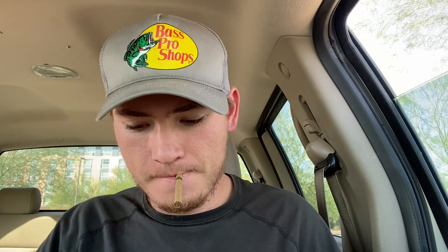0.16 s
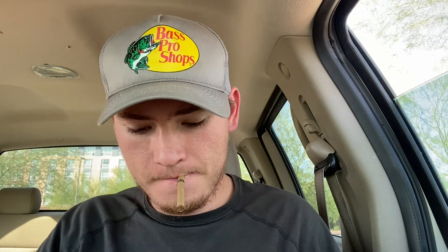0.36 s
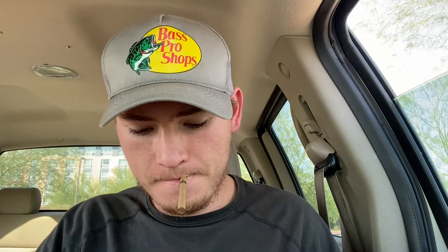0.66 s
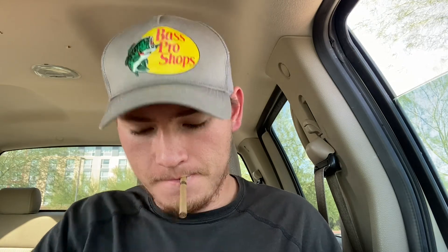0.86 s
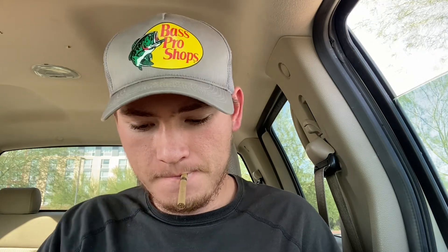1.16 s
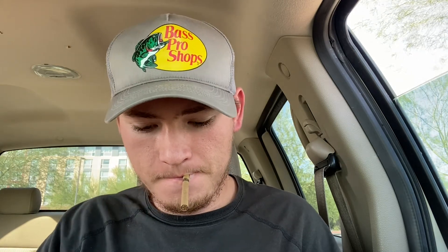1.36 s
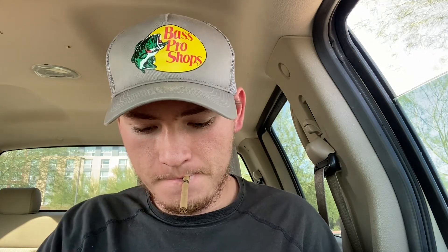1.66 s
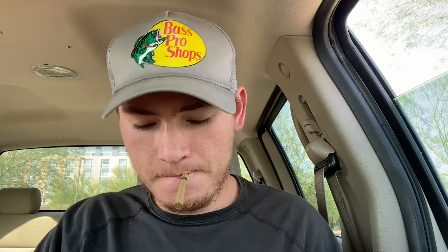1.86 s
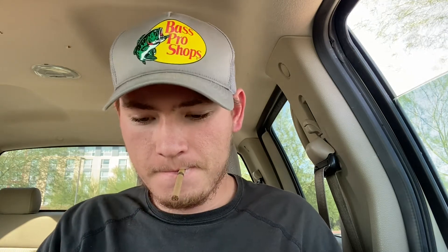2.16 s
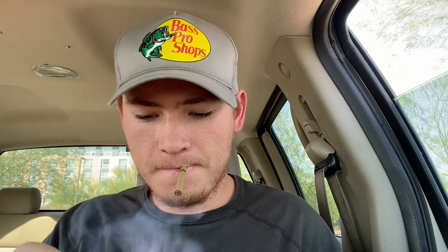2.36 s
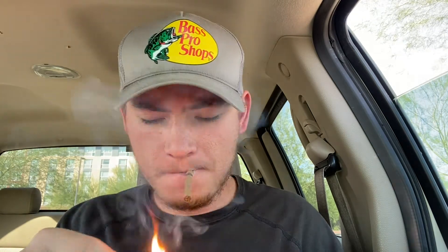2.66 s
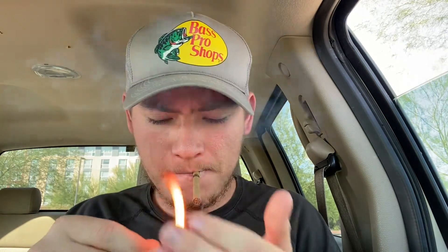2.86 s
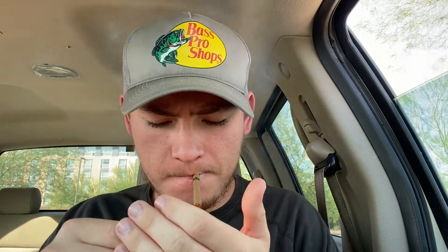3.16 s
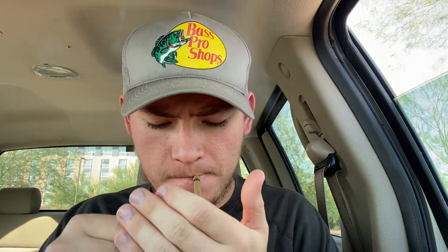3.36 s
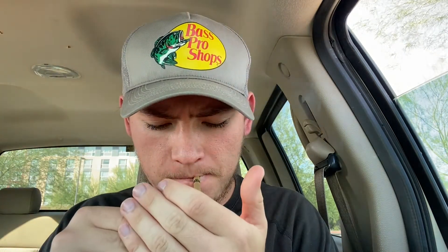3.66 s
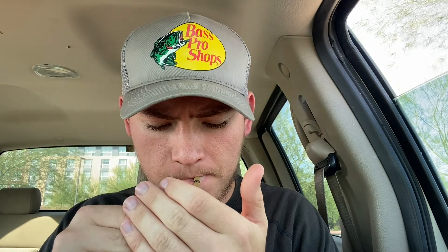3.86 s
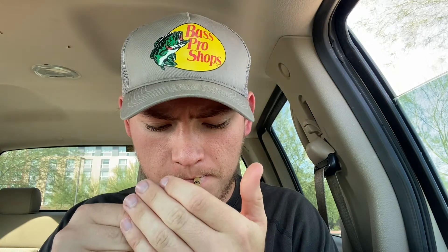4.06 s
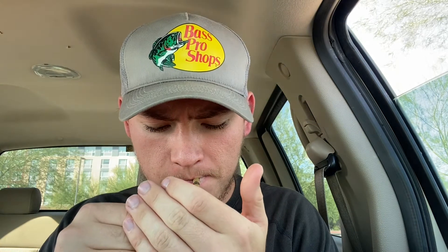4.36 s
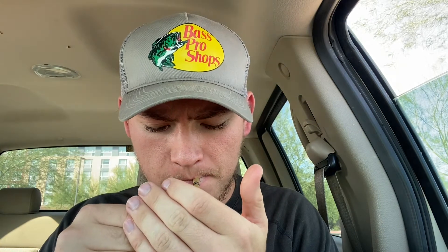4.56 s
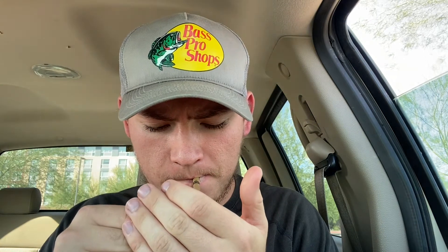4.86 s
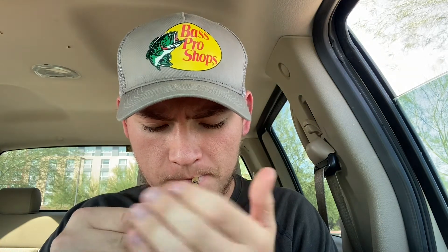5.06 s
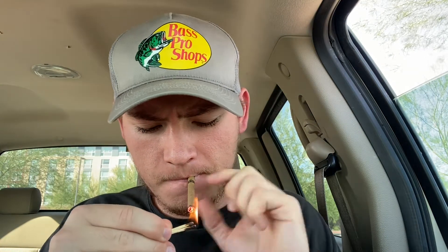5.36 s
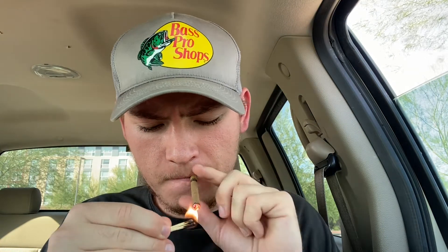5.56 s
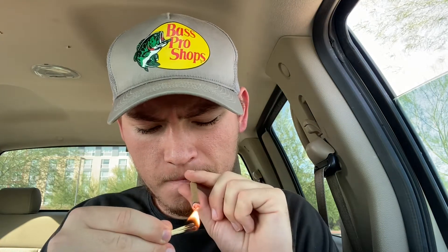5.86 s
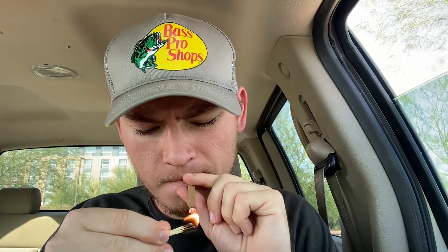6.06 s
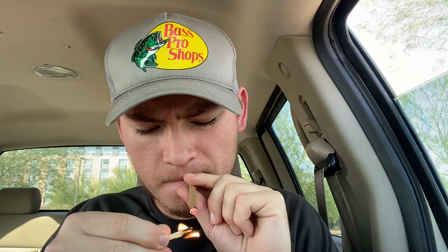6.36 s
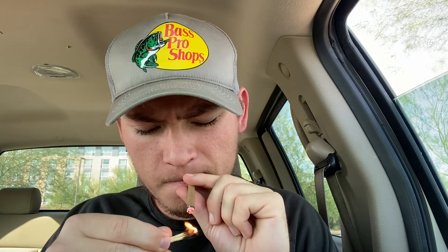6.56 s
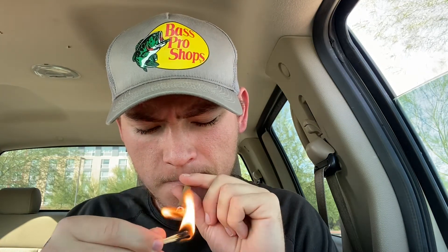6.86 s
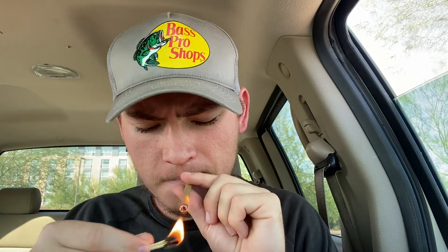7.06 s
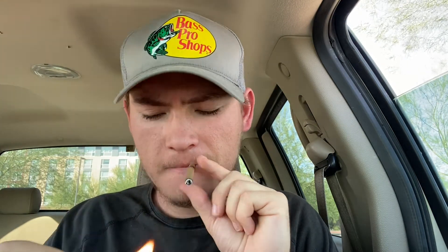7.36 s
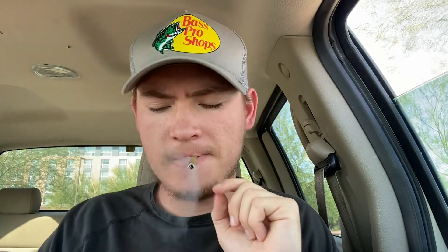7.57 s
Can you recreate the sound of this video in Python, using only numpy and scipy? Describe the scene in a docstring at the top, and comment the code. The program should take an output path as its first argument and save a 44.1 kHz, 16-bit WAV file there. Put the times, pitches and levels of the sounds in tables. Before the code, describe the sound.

Inside a parked car, low cabin hum and dull outside traffic run throughout. After faint rubbing and taps, a match head scrapes its box with a loud, squeaky rasp and knock, then a second, louder stroke about a second later. A fluttering flare roars and hisses with spitting jets for nearly a second and stops quickly. Small dry cracks and barely audible frying follow. Close stereo microphone, very dry cabin.

```python
"""A wooden match is scraped twice along its box in a parked car; friction makes rasp, chirps and grit spray.
With the second stroke the head lights, and flares for about a second with an uneven roar, hiss and jets.
The small flame then fries steadily at a cigar, with cracks, little pops and a faint whistle of narrow noise.
Under it lie a low cabin hum and outside traffic, two diffuse noise fields at two microphone ports."""
import sys
import numpy as np
from scipy import signal
from scipy.fft import rfft, irfft
from scipy.io import wavfile
from scipy.ndimage import uniform_filter1d, map_coordinates

SR = 44100
rng = np.random.default_rng(int(sys.argv[2]) if len(sys.argv) > 2 else 0)


def bounce(signal):
    """Save signal as a 16-bit WAV file at the path given by the first command-line argument."""
    frames = np.transpose(np.atleast_2d(signal))
    limited = np.clip(frames, -1, 1)
    pcm = np.round(limited * 32767).astype(np.int16)
    wavfile.write(sys.argv[1], SR, pcm)


N = 340313
TIME, HZ = np.arange(N) / SR, np.fft.rfftfreq(N, 1 / SR)


def gain_of(db):
    """The decibel law: level to amplitude ratio."""
    return 10 ** (np.asarray(db) / 20)


def evened(x):
    """Normalization by mean power: scales to rms 1."""
    return x / np.sqrt(np.mean(x ** 2) + 1e-20)


def read(points, hz=HZ):
    """Interpolation of a table along a log-frequency axis."""
    table_hz, value = np.transpose(points)
    return np.interp(np.log(hz + 1), np.log(table_hz + 1), value)


def follow(rows):
    """Linear interpolation in time: each column of a curve table at every sample."""
    s, *columns = np.transpose(rows)
    return [np.interp(TIME, s, column) for column in columns]


def coloured(x, spectrum):
    """Spectral shaping: multiplies the spectrum of x by a dB curve, then sets rms 1."""
    return evened(irfft(rfft(x) * gain_of(read(spectrum)), N))


def steadied(x, size=260):
    """Envelope flattening: holds the rms over `size` samples near 1."""
    return x / np.sqrt(np.abs(uniform_filter1d(x ** 2, size)) + 1e-9)


def grains(per_s, spread_db):
    """Shot noise: random clicks of uneven size at a mean rate, at rms 1."""
    size = gain_of(spread_db * np.minimum(rng.exponential(1, N), 5))
    present = rng.random(N) < per_s / SR
    return evened(rng.standard_normal(N) * size * present)


def wander(hz):
    """Low-passed noise: smooth random motion, rms 1, with changes up to about hz a second."""
    return evened(irfft(rfft(rng.standard_normal(N)) / (1 + (HZ / hz) ** 4), N))


def fuzzy(pitch, width_hz):
    """Amplitude modulation of a sine by noise: a band, rms about 1, around a pitch that may move."""
    phase = 2 * np.pi * np.cumsum(pitch * np.ones(N)) / SR
    return np.sqrt(2) * wander(hz=width_hz) * np.sin(phase)


def swells(rows):
    """Exponential rise and decay from rows (start_s, level_db, rise_s, hold_s, fall_s), summed in power."""
    power = np.zeros(N)
    for s, db, rise, hold, fall in rows:
        near = slice(*np.searchsorted(TIME, [s - 10 * rise, s + hold + 10 * fall]))
        t = TIME[near] - s  # zero where the hold begins
        exponent = np.minimum(0, np.minimum(t / rise, (hold - t) / fall))
        power[near] += (gain_of(db) * np.exp(exponent)) ** 2
    return np.sqrt(power)


def ticks(rows):
    """Impulsive excitation: sharp envelopes from rows (start_s, level_db, fall_s), peaking just after."""
    return swells((s + 0.00097, db, .0002, 0, fall) for s, db, fall in rows)


# spectrum of the cabin hum: pitch_hz [Hz], relative level_db [dB per Hz]
HUM_SPECTRUM = [(20, -26), (33, -12.5), (52, 4), (72, 2.5), (115, -14.5), (150, -6), (190, -8.5),
                (260, -17.5), (320, -21.5), (450, -32.5)]
# spectrum of the outside traffic: pitch_hz [Hz], relative level_db [dB per Hz]
ROAD_SPECTRUM = [(400, -2.5), (680, -4.5), (820, 5), (1000, 4.5), (1450, -3.5), (2200, -14), (3200, -22),
                 (4200, -25.5), (5600, -40.5), (8500, -45.5), (14000, -64.5)]
# traffic swelling and fading: start_s [s], level_db [dB], pitch_factor [ratio]
TRAFFIC = [(0, -41.5, 1.063), (1.399, -40.5, 0.98), (3.4, -46, 1.082), (4.2, -47.5, 1.065),
           (5.2, -46, 1.064), (6.201, -44, 1), (7.7, -43, 1.008)]
# phase between the ports in the diffuse field: pitch_hz [Hz], left_lead [radians]
FAR_PHASE = [(150, 0.3), (350, -2), (600, -1.5), (1400, -3), (2300, -6), (4000, -7.5)]
# coherence of the two ports: pitch_hz [Hz], likeness [0 to 1]
LIKENESS = [(50, 0.95), (150, 0.94), (300, 0.72), (1200, 0.59), (3000, 0.2)]
HUM_DB = -35.5
BRIGHTEN = 0.18  # dB per octave from 1 to 4 kHz, for each dB of traffic above its mean level


def background():
    """Partial coherence in a diffuse field: cabin hum, and tyre noise through the glass, from many sides."""
    frames, hz = N // 512 + 3, np.fft.rfftfreq(2048, 1 / SR)
    t = np.arange(frames) * 512 / SR
    same = np.clip(read(LIKENESS, hz), 0, 1)

    def diffuse(field_db):
        """Coherence mixing: the right port shares part of the left port's noise."""
        a, b, c, d = rng.standard_normal((4, frames, len(hz)))
        left = a + 1j * b
        shared = same * np.exp(-1j * read(FAR_PHASE, hz)) * left
        right = shared + np.sqrt(1 - same ** 2) * (c + 1j * d)
        z = np.array([left, right]) * gain_of(field_db)
        return evened(signal.istft(z.transpose(0, 2, 1), nperseg=2048, noverlap=1536)[1][:, :N])

    s, level, pitch = np.transpose(TRAFFIC)
    octaves = np.log2(np.clip(hz / 1000, 1, 4))
    bright = BRIGHTEN * np.interp(t, s, level - level.mean())[:, None] * octaves
    # random patches in time and pitch make the tyre roar uneven
    patches = uniform_filter1d(rng.standard_normal((frames, len(hz))), 40, axis=0)
    patches = evened(uniform_filter1d(patches, 3, axis=1))
    shift = np.interp(t, s, pitch) * (1 + .025 * np.interp(t, TIME, wander(hz=4)))
    tyres = diffuse(read(ROAD_SPECTRUM, hz / shift[:, None]) + bright + 1.6 * patches)
    hum = diffuse(read([(10, -70.0)] + list(HUM_SPECTRUM) + [(800, -39.5), (3000, -100)], hz))
    return gain_of(HUM_DB) * hum + gain_of(follow(TRAFFIC)[0]) * tyres


# spectrum of scraped grit: pitch_hz [Hz], relative level_db [dB per Hz]
GRIT = [(300, -14), (1200, -7), (2800, -4.5), (3800, -8), (4600, 0), (5300, -3.5), (7200, -.5),
        (10000, -2.5), (12000, -1.5), (15000, -12)]
# spectrum of knocked dry wood and card: pitch_hz [Hz], relative level_db [dB per Hz]
KNOCK = [(400, -18), (750, -7), (1400, -2.5), (1950, 2), (2900, -7), (5000, -8.5), (7500, -19),
         (10000, -35)]
# the stick sliding lightly over the box: middle_s [s], relative level_db [dB], swell_and_fade_s [s]
RUBS = [(.036, -53, 0.019), (.27, -69.5, 0.12), (0.66, -62.5, 0.05), (.85, -51, 0.044), (0.981, -60, 0.076),
        (1.637, -51, 0.011)]


def rubs():
    """Sliding friction: many small contacts as the stick moves unevenly over the box, grazing the grit."""
    graze = coloured(grains(4000, 2.5), GRIT)
    card = gain_of(6.5) * coloured(grains(3000, 1.4), KNOCK)
    pressure = swells((s, db, fade, 0, fade) for s, db, fade in RUBS)
    return pressure * gain_of(2 * wander(hz=120.3)) * (graze + card)


def woody():
    """Heavily damped impact noise: the dull, dry body of a knock or crack, held level."""
    return steadied(coloured(grains(8300, 2.4), KNOCK))


# modes of the hollow box: pitch_hz [Hz], width_hz [Hz], relative scraped_db [dB], relative jolted_db [dB]
BOX = [(176, 30, -20, -18), (810, 130, -21, -5), (1220, 100, -6, -3.5), (1760, 160, 1.5, -5),
       (2090, 252, -3, -15), (2640, 220, 2, -4), (3330, 300, -9, -14), (4580, 220, -4, -9)]


def jolts(rows, level_db):
    """Free vibration: each jolt (start_s, level_db) sets the box modes ringing in damped cosines."""
    out, t = np.zeros(N), TIME[:4096]
    knock = sum(gain_of(db) * np.exp(-np.pi * width * t) * np.cos(2 * np.pi * hz * t)
                for hz, width, _, db in BOX)
    onset = 1 - np.exp(-t / 0.00084)
    for s, db in rows:
        out[round(s * SR):][:len(t)] += gain_of(db + level_db) * knock * onset
    return out


# short clicks and dull knocks: handling taps, snaps within the first stroke, a soft rustle:
# start_s [s], click_db [dB], body_db [dB], fall_s [s]
# body_db sets the dull knock and, with an offset, the ringing of the box
TAPS = [(0.0368, -50, -31, 0.0046), (0.258, -66, -36, 0.0027), (0.2822, -60, -21.5, 0.0013),
        (0.312, -56, -38.5, 0.0035), (.567, -48, -40, 0.0033), (.613, -37.5, -34, 0.0053),
        (0.619, -41, -38, 0.0035), (0.779, -12.5, -22, 0.0014), (0.7938, -29, -10, 0.0032),
        (0.971, -47, -29, 0.0065), (1.014, -47, -35, 0.0018), (1.874, -58, -37, .008)]


def taps():
    """Impact excitation: short clicks with a dull body and a ring of the box modes."""
    body = ticks((s, db, fall) for s, _, db, fall in TAPS) * woody()
    click_noise = steadied(coloured(grains(9300, 2.6), GRIT))
    click = ticks((s, db, fall) for s, db, _, fall in TAPS) * click_noise
    return body + click + jolts([(s, db) for s, _, db, _ in TAPS], level_db=-15.5)


# dull, soft little pops and bumps, some of them faint background:
# start_s [s], level_db [dB], pitch_hz [Hz], fall_s [s]
POPS = [(0.615, -35.5, 560, 0.0088), (1.876, -37, 560, 0.0056), (2.421, -42, 560, .006),
        (3.448, -43, 1200, 0.00289), (6.478, -48, 1000, 0.0032)]


def pops():
    """Decaying narrow-band noise: soft, short pops, each around its own pitch."""
    pitch = follow([(s + t, hz) for s, _, hz, fall in POPS for t in (0, 10 * fall)])[0]
    envelope = ticks((s, db, fall) for s, db, _, fall in POPS)
    return envelope * steadied(fuzzy(pitch, width_hz=260))


def box(x):
    """Forced resonance: the scraped matchbox answers with a few broad modes."""
    out = np.zeros(N)
    for k, (hz, width, db, _) in enumerate(BOX):
        mode = signal.lfilter(*signal.iirpeak(hz, hz / width, SR), x)
        out += (-1) ** k * gain_of(db) * mode
    return evened(out)


# the head scraping the striker, hard or lightly:
# full_pressure_s [s], hold_s [s], grit_db [dB], relative rasp_db [dB], rasp_pitch_hz [Hz]
STROKES = [(0.784, 0.02, -29, -25.5, 1993), (0.865, 0.0042, -47, -33, 2070),
           (0.962, 0.0017, -46, -40, 2020), (1.7428, 0.0023, -9.5, -28, 1880)]
# the head catching hard and breaking free: start_s [s], hold_s [s], chirp_db [dB], grit_db [dB],
# central pitch_hz [Hz], relative jolt_db [dB]
CATCHES = [(.7605, .005, -24, -44, 2150, -50), (.7708, .002, -18, -36, 2150, -46),
           (.7765, .0045, -13, -29, 2000, -36), (.7948, .002, -19, -21, 1850, -19),
           (.798, .001, -24, -24, 1700, -13), (.8135, .002, -28, -29, 1900, -40),
           (1.715, .003, -26, -42, 1850, -42), (1.7262, .0025, -12.5, -28, 2030, -32),
           (1.7325, .0025, -7, -26, 1980, -21), (1.741, .005, -3.5, -13, 1790, -20),
           (1.7465, .001, -16, -16, 1700, -13.5)]
ATTACK_S, RELEASE_S = 0.0088, 0.0059  # pressure builds and lets go alike in every stroke
RASP_LEAD_S, SAG_HZ_PER_S = 0.0022, 6500  # rasp starts before the grit sprays; its pitch drops along a stroke
CHATTER_HZ, CHATTER_DB = 190, 1  # stick and slip make the rasp throb irregularly
CATCH_RISE_S, CATCH_FALL_S, CATCH_GRAIN_DB = .001, .0015, -7  # the last is box noise in a chirp


def strokes():
    """Stick-slip friction: the head rasps over the grit and chirps at each catch, shaking the box."""
    grit = swells((s, db, ATTACK_S, hold, RELEASE_S) for s, hold, db, _, _ in STROKES)
    drag = swells((s - RASP_LEAD_S, db, ATTACK_S, hold, RELEASE_S) for s, hold, _, db, _ in STROKES)
    catches = swells((s, db, CATCH_RISE_S, hold, CATCH_FALL_S) for s, hold, db, *_ in CATCHES)
    spray = swells((s, db, CATCH_RISE_S, hold, CATCH_FALL_S) for s, hold, _, db, _, _ in CATCHES)
    ring = steadied(box(grains(9000, 2)))

    pitch = follow([(s + t, hz - SAG_HZ_PER_S * t) for s, *_, hz in STROKES for t in (-.02, .01)])[0]
    chatter = gain_of(CHATTER_DB * wander(hz=CHATTER_HZ))
    rasp = drag * chatter * steadied(fuzzy(pitch, width_hz=260) + gain_of(-6) * ring)

    chirp_hz = follow([(s + t, hz) for s, hold, _, _, hz, _ in CATCHES for t in (0, hold)])[0]
    chirp_hz = chirp_hz * (1 + .04 * wander(hz=600))
    tone = np.sin(2 * np.pi * np.cumsum(chirp_hz) / SR)
    chirps = catches * (tone + gain_of(CATCH_GRAIN_DB) * ring)

    # the box carries the rasp; the grit itself sprays the treble
    treble = np.hypot(grit, spray) * steadied(coloured(grains(9000, 1.9), GRIT))
    return rasp + chirps + treble + jolts([(s, db) for s, *_, db in CATCHES], level_db=6.0)


def patchy(x, depth_db):
    """Random modulation: uneven level in brief patches of time and pitch."""
    z = signal.stft(x, nperseg=256)[2]
    patches = uniform_filter1d(rng.standard_normal(z.shape), size=5, axis=0)
    patches = evened(uniform_filter1d(patches, size=6, axis=1))
    return signal.istft(z * gain_of(depth_db * patches), nperseg=256)[1][:N]


ECHO_S, ECHO_DB, ECHO_SWAY = .0016, -6, .15  # mean delay, echo level, rms share by which the delay sways


def off_the_hand(x):
    """Comb filtering: the moving hand throws the flare back, so bands of colour drift through it."""
    delay_s = ECHO_S * (1 + ECHO_SWAY * wander(hz=2))
    return x + gain_of(ECHO_DB) * map_coordinates(x, [(TIME - delay_s) * SR])


# roar and hiss of the head: start_s [s], relative roar_db [dB], relative hiss_db [dB]
FLARE = [(1.82, -64, -60.5), (1.92, -51, -49.5), (2.1, -56.5, -59.5), (2.24, -48.5, -49),
         (2.39, -46, -49.5), (2.6, -48.5, -48), (2.72, -56.5, -53)]
# spectrum of the burning hiss: pitch_hz [Hz], relative level_db [dB per Hz]
HISS = [(1500, -9.5), (3000, -1), (4600, -2), (6500, -3), (9000, -2), (12500, -4), (15000, -13)]
# spectrum of the burning roar: pitch_hz [Hz], relative level_db [dB per Hz]
ROAR = [(120, -2.5), (250, -10.5), (450, -8), (900, 3), (1400, -3), (1900, -3), (2800, -5.5), (5000, -22.5)]
# gas bursting from the head: peak_s [s], relative spit_db [dB], hiss_db [dB], fall_s [s], pitch_hz [Hz]
SPUTTERS = [(1.951, -37, -44, 0.0036, 1920), (2.153, -32, -60, 0.0024, 1345),
            (2.273, -28, -30, 0.0043, 2096), (2.292, -31.5, -29.5, 0.0055, 1834),
            (2.404, -35.5, -40, 0.0075, 2198), (2.416, -25, -33, 0.0019, 2102),
            (2.4218, -26, -30, 0.0066, 1650), (2.439, -36, -32.5, 0.0069, 1768)]
# spectrum of the hiss of a jet: pitch_hz [Hz], relative level_db [dB per Hz]
JET = [(2500, 2), (7200, 0), (9000, -7), (15000, -15.5)]
FADE_IN_S, RAMP_S, BURNT_OUT = 1.6, 0.033, 2.735  # s: the faint roar and hiss fade in, ramp up, are spent
ROAR_DB = 3  # added to the roar curve
JET_RISE, RAGGED_DB = 0.48, 3  # rise as a share of the fall time; rms unevenness of the spit


def flare():
    """Combustion noise: a fluttering roar and dense hiss, spitting jets; the roar dies away faster."""
    roar_db, hiss_db = follow(FLARE)
    burn = np.clip((TIME - FADE_IN_S) / RAMP_S, 0, 1) * gain_of(wander(hz=30))
    spent_s = np.maximum(TIME - BURNT_OUT, 0)
    flutter_db = roar_db + ROAR_DB + wander(hz=80)
    roar = burn * np.exp(-spent_s / 0.0089) * gain_of(flutter_db) * coloured(grains(5600, 3.5), ROAR)
    hiss = burn * np.exp(-spent_s / 0.018) * gain_of(hiss_db) * coloured(grains(20000, 1.8), HISS)
    flame = off_the_hand(patchy(roar + hiss, depth_db=2.1))

    jet_swell = swells((s, db, JET_RISE * fall, 0, fall) for s, _, db, fall, _ in SPUTTERS)
    jets = jet_swell * coloured(grains(9000, 1.8), JET)
    spit_swell = swells((s, db, JET_RISE * fall, 0, fall) for s, db, _, fall, _ in SPUTTERS)
    spit = spit_swell * gain_of(RAGGED_DB * wander(hz=222))
    spit_noise = steadied(fuzzy(follow(SPUTTERS)[-1], width_hz=620) + woody() / 2)
    return flame + jets + spit * spit_noise


# wood and leaf cracking in the flame: start_s [s], snap_db [dB], body_db [dB]
CRACKS = [(2.7993, -56, -49), (3.1034, -51.5, -47), (3.1635, -48, -44), (3.7627, -61, -58),
          (4.1321, -59, -48), (4.607, -52, -54), (5.305, -47, -51), (5.9328, -39, -41), (7.524, -51, -41.5)]
# a thin, faint whistle: start_s [s], pitch_hz [Hz], level_db [dB]
SIZZLE = [(4.6, 6400, -95), (4.75, 6440, -83.5), (5.1, 6510, -82), (5.42, 6650, -72.5), (5.8, 6400, -76.5)]
# swells of the frying, added in power to its steady level: peak_s [s], level_db [dB], swell_and_fade_s [s]
FLARE_UPS = [(2.78, -70, 0.11), (3.049, -76, 0.11), (5.25, -70.5, 0.17)]
FRYING_DB, CRACK_FALL_S = -81, 0.0023  # steady level before flutter; decay of every crack


def small_flame():
    """Crackle as shot noise: the stick cracks and fries while it lights the cigar, with a faint whistle."""
    fizz = coloured(grains(22000, 1.9), [(1500, -11.0), (4500, -14), (7500, 2.5), (10000, -6),
                                         (13000, -3.0), (15500, -14.5)])  # Hz, dB per Hz
    snap_noise = steadied(coloured(grains(22000, 1.55), GRIT))
    snap = ticks((s, db, CRACK_FALL_S) for s, db, _ in CRACKS) * snap_noise
    body = ticks((s, db, CRACK_FALL_S) for s, _, db in CRACKS) * woody()
    flare_ups = swells((s, db, fade, 0, fade) for s, db, fade in FLARE_UPS)
    heat = np.hypot(gain_of(FRYING_DB), flare_ups)
    frying = heat * gain_of(2.0 * wander(hz=25.1)) * fizz * (TIME > BURNT_OUT)
    hz, db = follow(SIZZLE)
    whistling = (TIME > SIZZLE[0][0]) * (TIME < SIZZLE[-1][0])
    whistle = gain_of(db) * fuzzy(hz, width_hz=320) * whistling
    return snap + body + frying + whistle


# phase between the ports for the near sounds: pitch_hz [Hz], left_lead [radians]
NEAR_PHASE = [(20, 0), (250, -.3), (700, -1.2), (2200, -1.3), (3400, -2.8), (6400, -1.1), (8700, .8),
              (10400, 3.1), (14500, 7.6)]
# reverberation of the cabin: pitch_hz [Hz], t60_s [s to fall by 60 dB]
CABIN = [(150, 0.023), (1000, 0.067), (4000, 0.096), (14000, 0.056)]


def cabin(x, wet_db):
    """Direct sound, early reflection and reverberation: echoes off the glass, then a very short tail."""
    t = TIME[:8192]
    sparse = rng.choice([-1., 1.], (2, len(t))) * (rng.random((2, len(t))) < .1) * (t > .002)
    hz, lag, z = signal.stft(sparse, SR, nperseg=128)
    decay = gain_of(-60 * lag / read(CABIN, hz)[:, None])
    tail = signal.istft(z * decay, SR, nperseg=128)[1]
    tail /= np.linalg.norm(tail, axis=1, keepdims=True)
    # upholstery swallows the treble of the tail
    room = gain_of(wet_db) * rfft(tail, N) / np.sqrt(1 + (HZ / 6000) ** 2)
    echoes = [(.0026, -16.5), (.0045, -19)]  # delay s, dB
    early = 1 + sum(gain_of(db) * np.exp(-2j * np.pi * HZ * s) for s, db in echoes)
    direct = np.array([early, early * np.exp(-1j * read(NEAR_PHASE))])
    return irfft(rfft(x) * (direct + room), N)


# level difference of the ports: pitch_hz [Hz], left_minus_right_db [dB]
BALANCE = [(40, -0.5), (200, -1), (500, -3.5), (900, -4.5), (1300, -2), (1800, 1), (3000, 0.5),
           (5000, -2.5), (9000, 0)]


def scene():
    """Superposition: match and cabin sound together; the right port favours the low mids."""
    near = rubs() + taps() + pops() + strokes() + flare() + small_flame()
    mix = cabin(near, wet_db=-6.5) + background()
    # half the difference goes to each port
    port_gain = gain_of(np.array([[.5], [-.5]]) * read(BALANCE))
    return irfft(rfft(mix) * port_gain, N)


EDGE_HZ = 15000  # upper band limit


def record(dry):
    """Band limiting and clipping: deepest bass drops, peaks clip at full scale, then the treble is cut."""
    thinned = signal.sosfilt(signal.butter(4, 33, "high", fs=SR, output="sos"), dry)
    low_pass = signal.firwin(511, EDGE_HZ, window=("kaiser", 9), fs=SR)
    return signal.oaconvolve(np.clip(thinned, -1, 1), low_pass[None], "same")


dry = scene()
out = record(dry)
bounce(out)
```